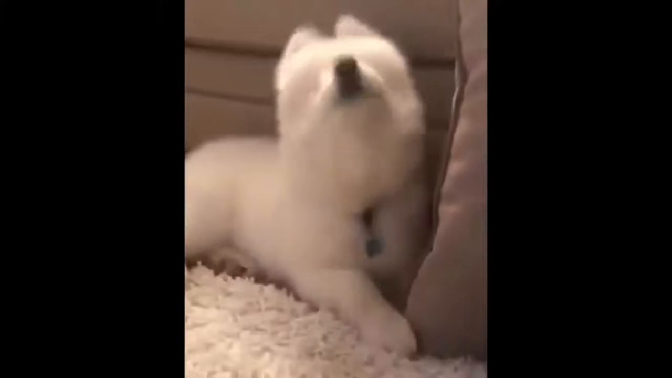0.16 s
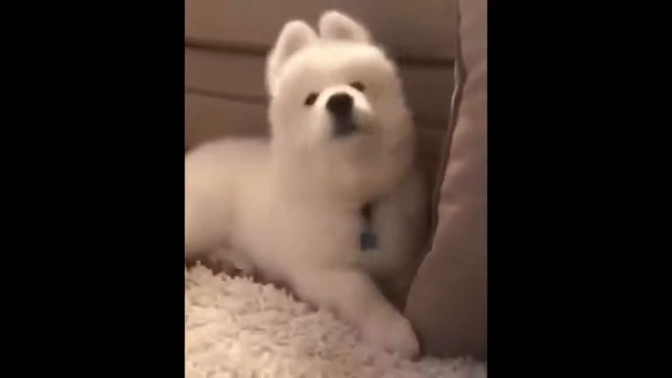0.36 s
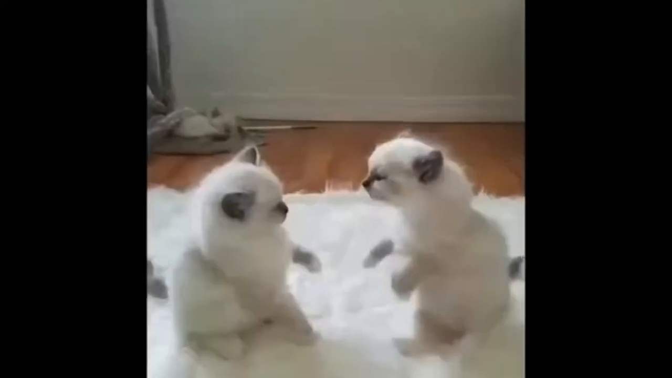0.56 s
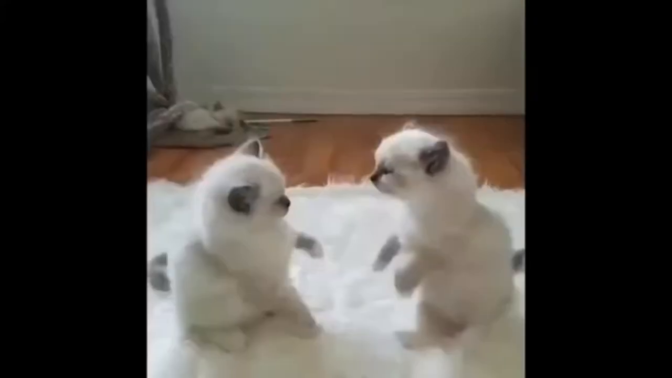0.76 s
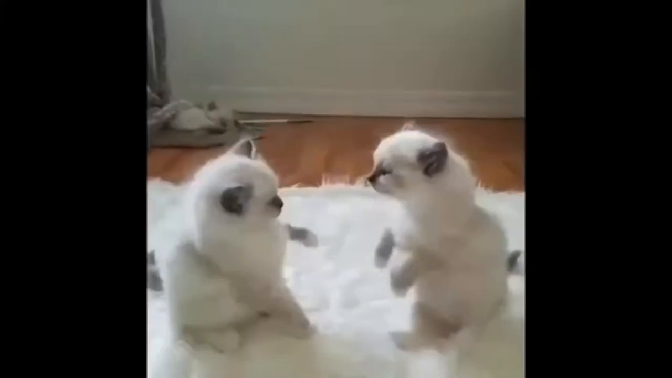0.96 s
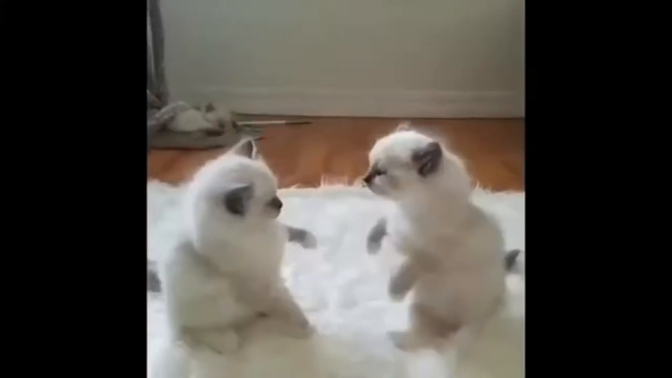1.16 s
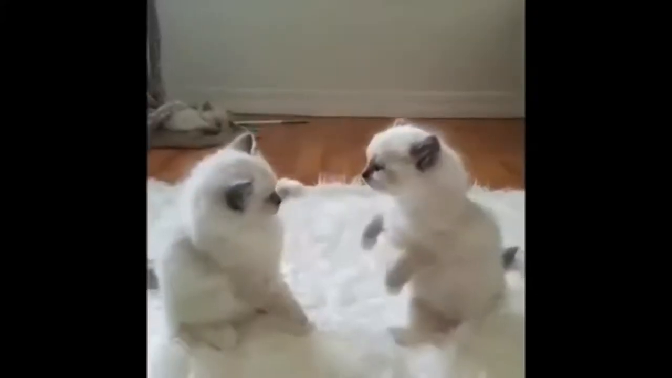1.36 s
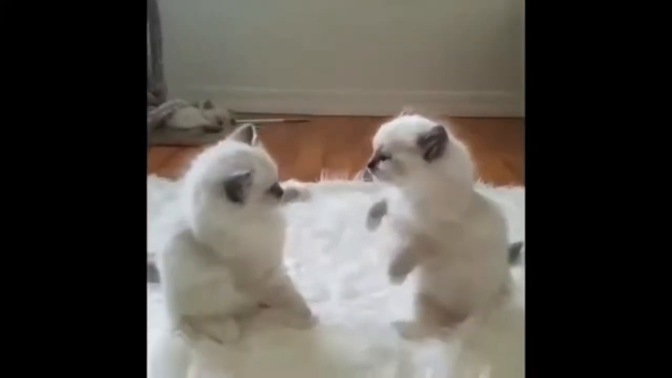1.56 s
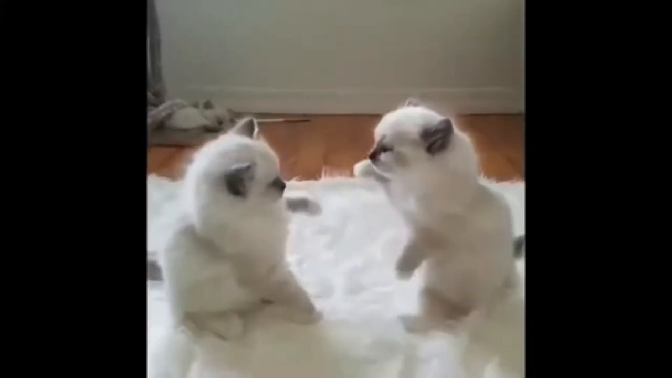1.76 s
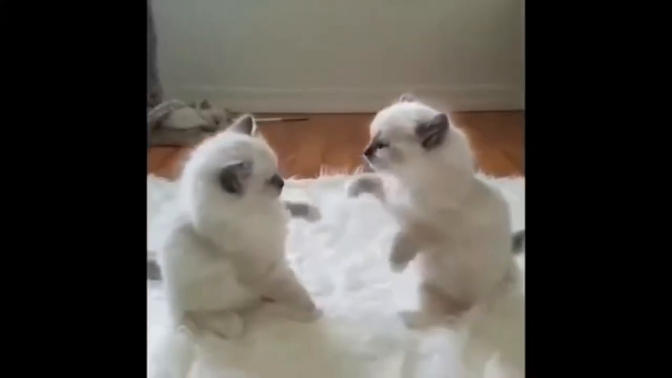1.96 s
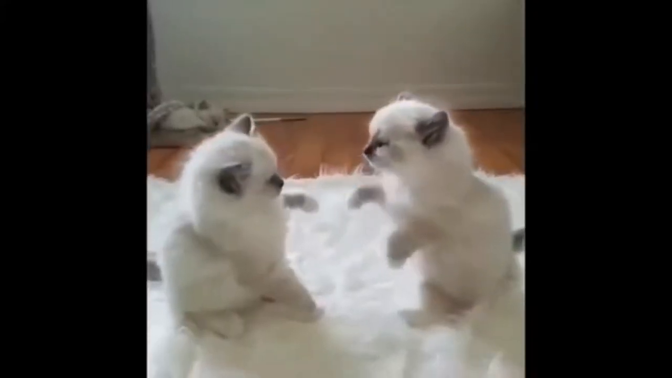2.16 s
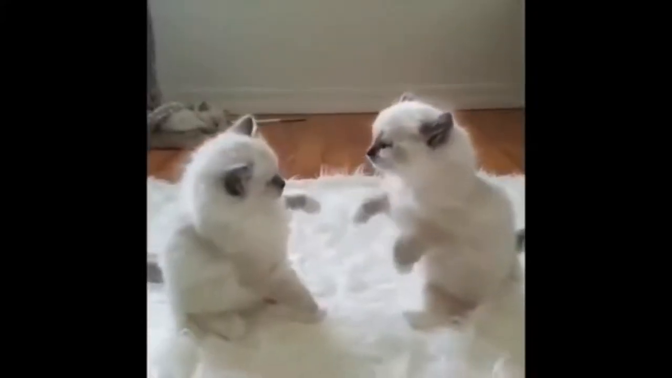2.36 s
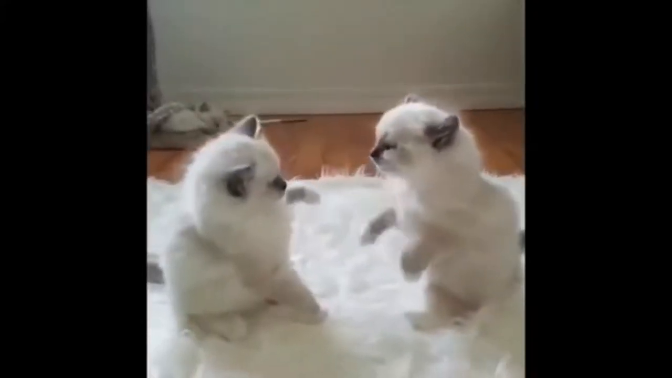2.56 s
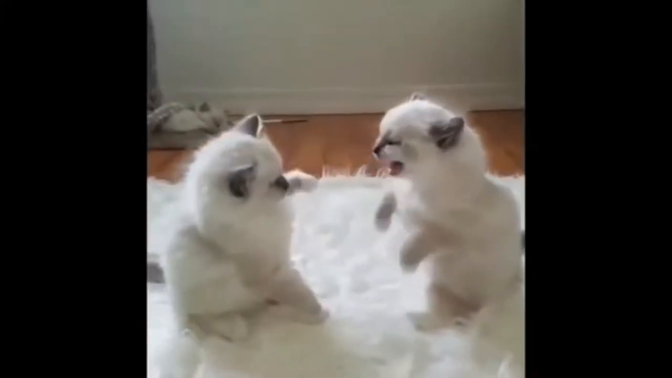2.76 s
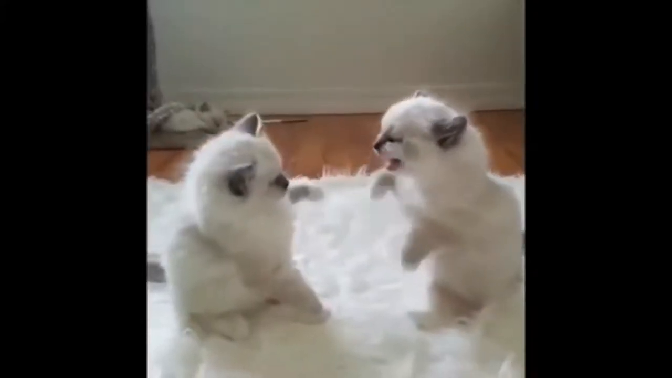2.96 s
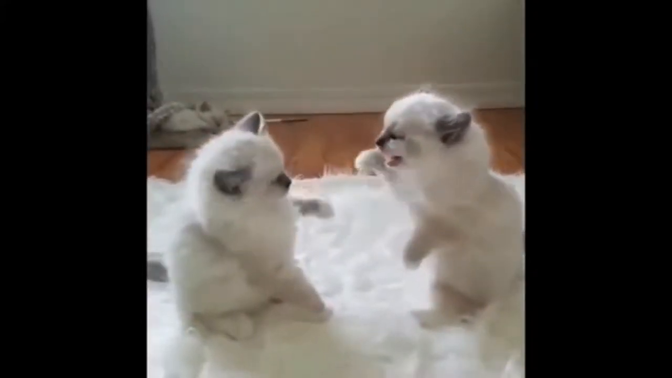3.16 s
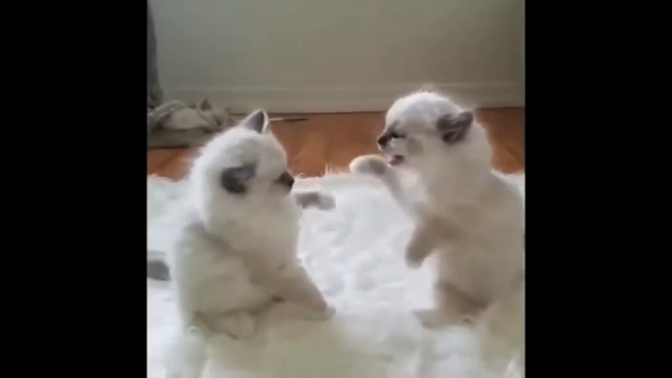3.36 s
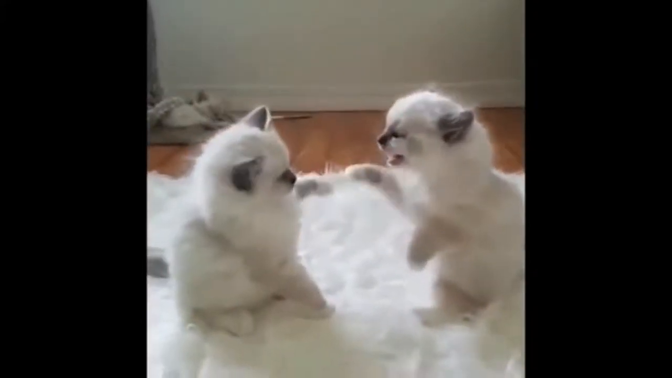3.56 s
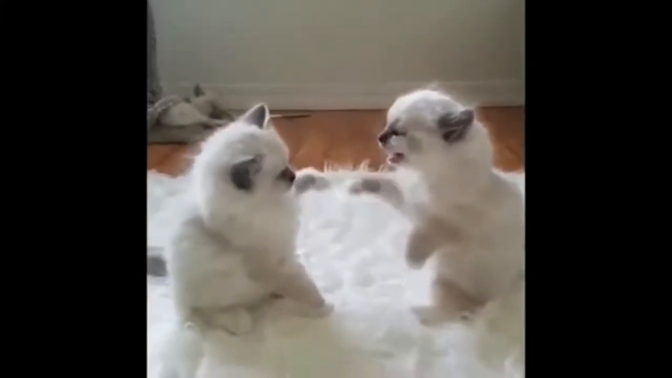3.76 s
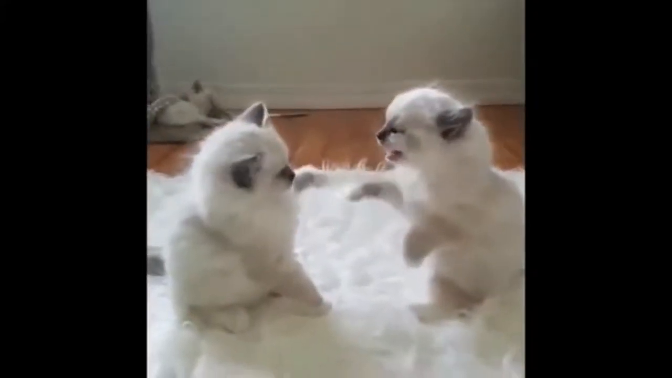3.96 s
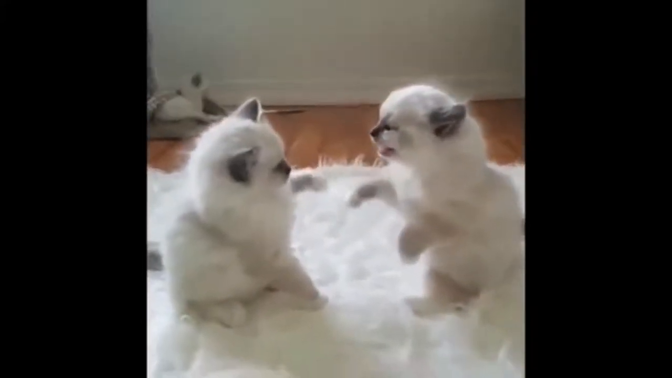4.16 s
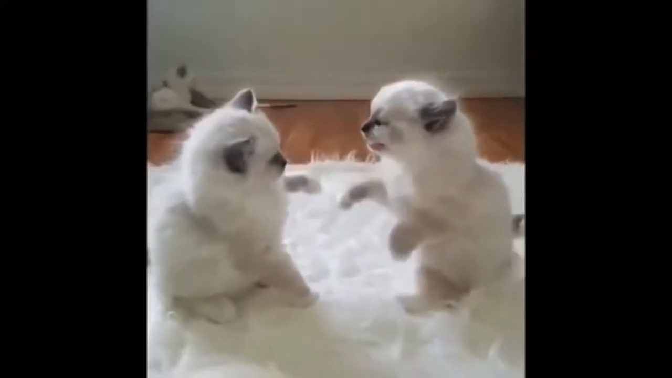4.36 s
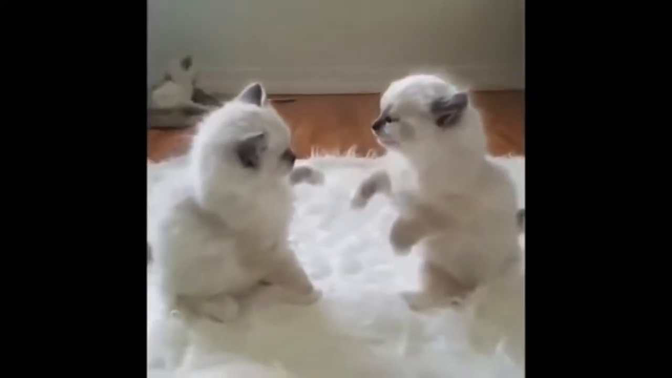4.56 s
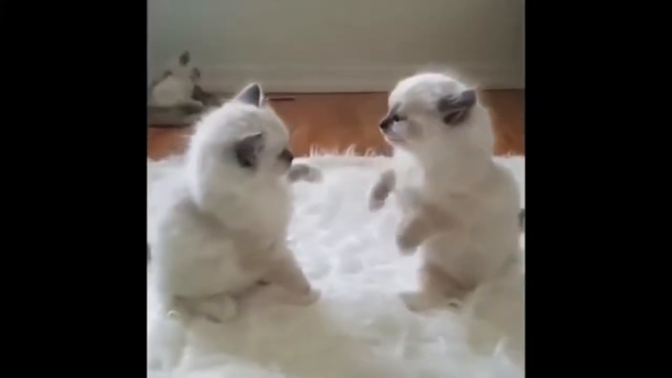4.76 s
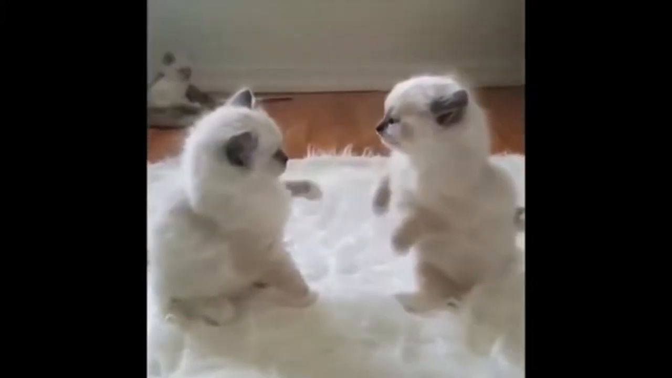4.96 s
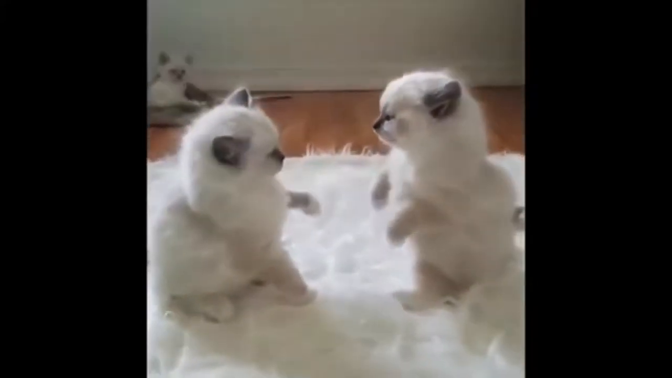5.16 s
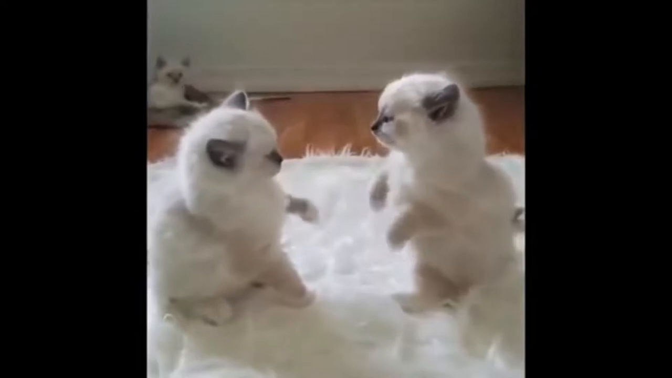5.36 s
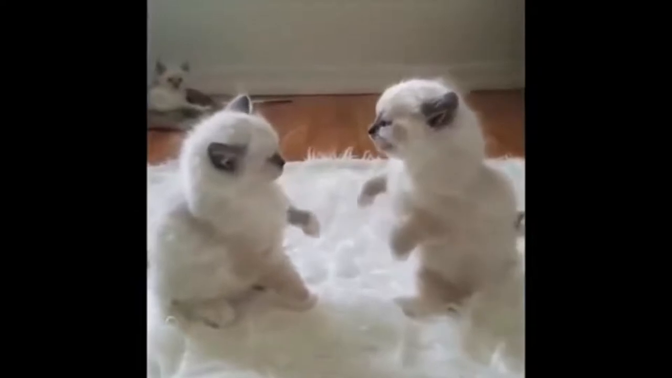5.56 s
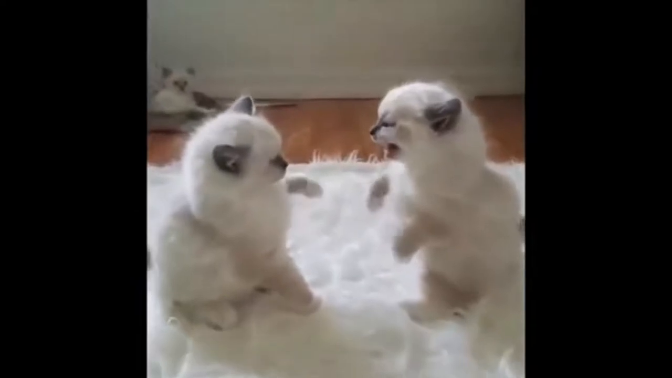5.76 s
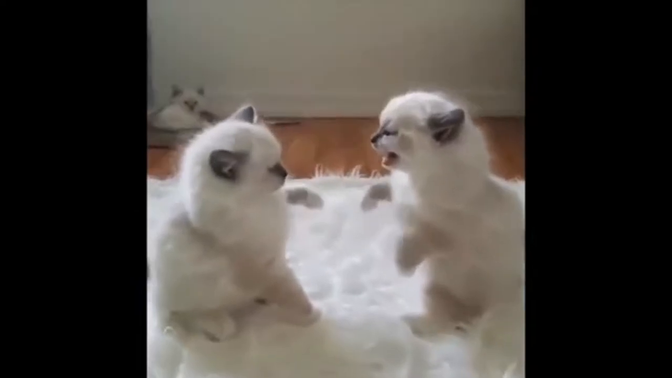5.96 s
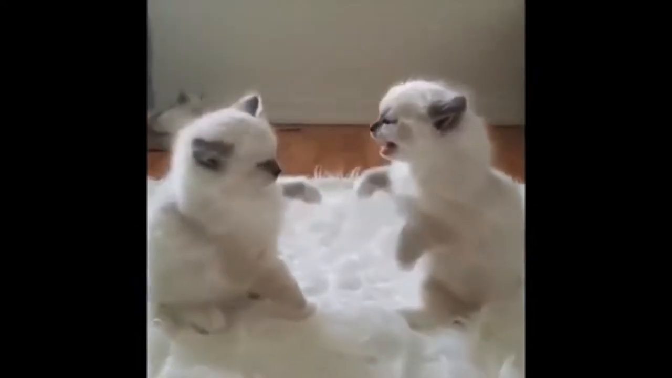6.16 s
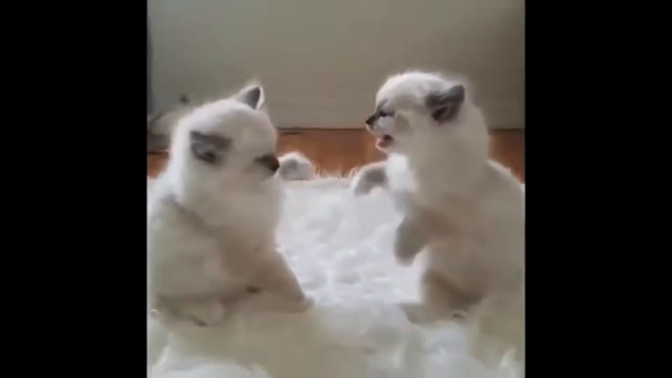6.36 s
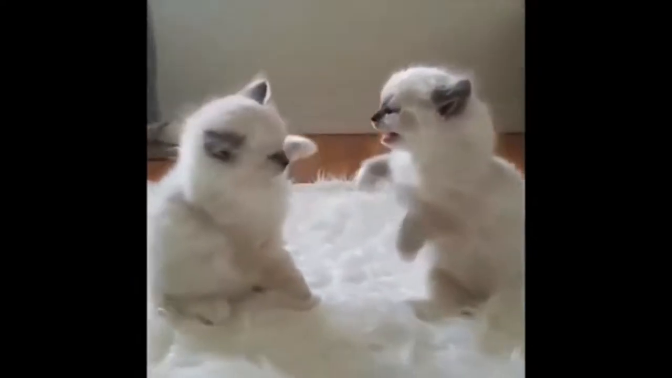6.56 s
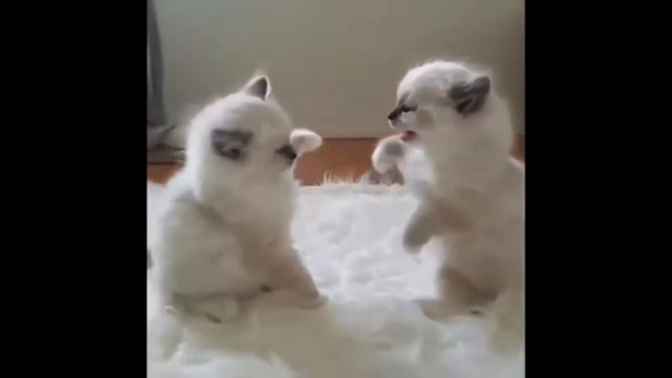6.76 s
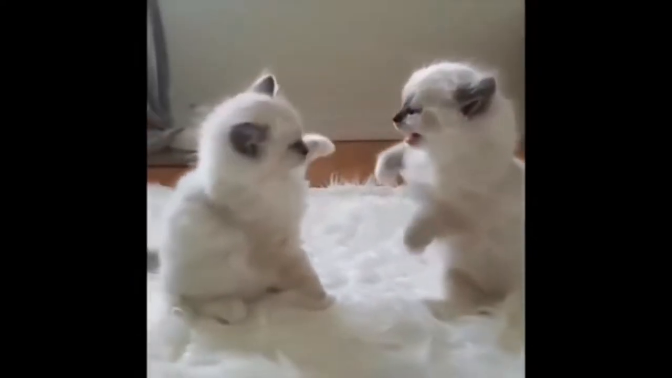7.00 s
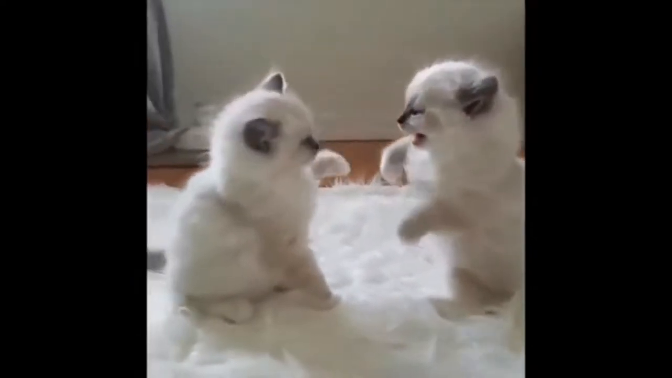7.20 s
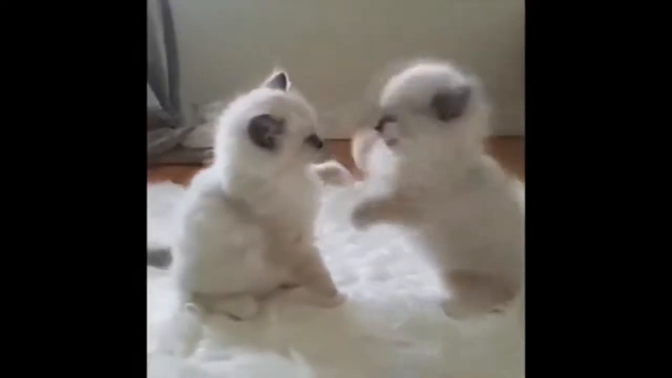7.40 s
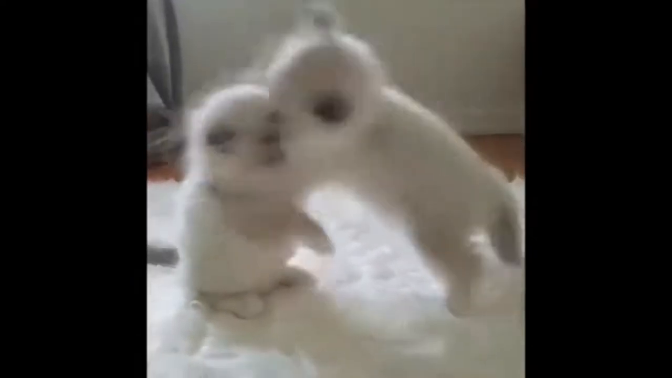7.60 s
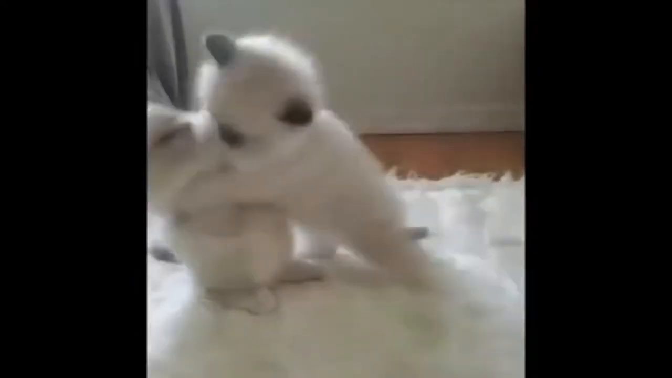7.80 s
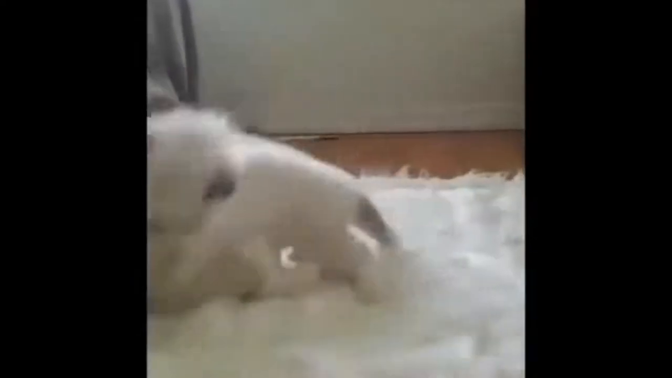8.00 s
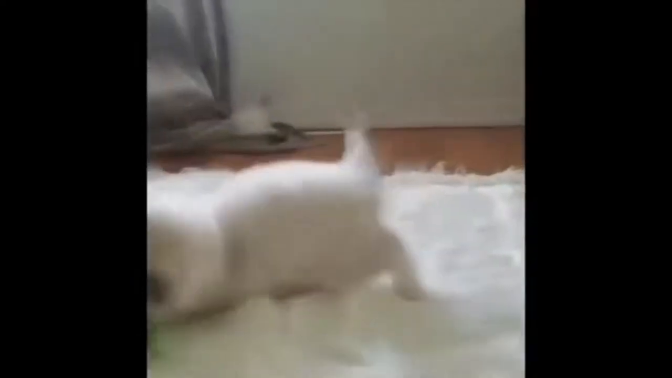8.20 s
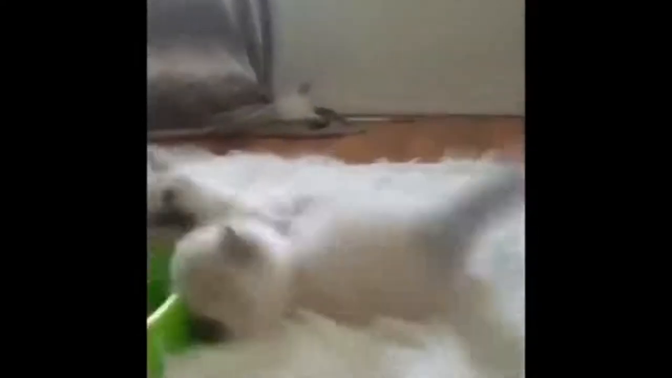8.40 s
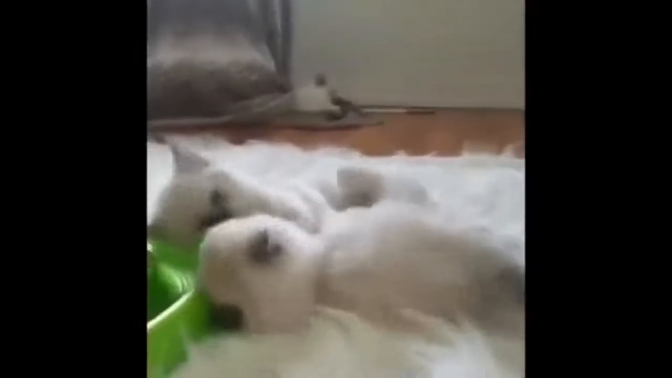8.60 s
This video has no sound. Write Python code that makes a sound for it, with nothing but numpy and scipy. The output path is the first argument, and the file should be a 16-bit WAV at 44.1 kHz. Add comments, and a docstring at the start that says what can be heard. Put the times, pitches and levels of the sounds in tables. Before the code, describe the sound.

In a home, a single high puppy yelp sounds right by the microphone and rings briefly in the room. After a short gap, two kittens spar on a rug, their paws lightly tapping and scuffing over a very low hum. Two long, faint, high meows come from a little farther away, with a quick cluster of close clicks between them. Finally a kitten bumps into something hollow with a solid thump.

```python
"""Puppy yelp and sparring kittens

A puppy close to a phone gives one short yelp that cracks upward and excites a living room's modes.
After a moment of silence, another room: two kittens spar on a rug, one drawing out two thin, faint
meows. Each voice is a harmonic source filtered by throat and mouth. Fur rustles, paws tap, something
clicks, and a tumble ends in the thump of a hollow object, over a low appliance hum."""
import sys
import numpy as np
from scipy import signal
from scipy.fft import rfft, irfft, next_fast_len
from scipy.io import wavfile
from scipy.ndimage import uniform_filter1d, map_coordinates

SR = 44100
rng = np.random.default_rng(int(sys.argv[2]) if len(sys.argv) > 2 else 0)


def to_wav(sig):
    """Store sig (one row per channel, or 1-D mono) as 16-bit WAV at the path in sys.argv[1].

    Samples outside -1..1 are clipped; the rate is SR.
    """
    pcm = np.clip(np.atleast_2d(sig), -1, 1) * 32767
    pcm = np.round(pcm).astype(np.int16)
    wavfile.write(sys.argv[1], SR, pcm.T)  # frames by channels


N = 380731
T = np.arange(N) / SR
PUPPY_END_S, KITTENS_START_S = .686, .764
TOP_HZ, KITTENS_TOP_HZ = 13900, 13200
ANTIPHASE = np.array([[1], [-1]])  # left, right


def undb(db):
    """Amplitude ratio of a level in decibels."""
    return 10 ** (np.asarray(db) / 20)


def unit(x):
    """Normalisation to rms 1."""
    return x / np.sqrt(np.mean(x ** 2) + 1e-30)


def since(start):
    """Seconds after a moment, zero before it."""
    return np.maximum(T - start, 0)


def until(end):
    """Seconds before a moment, zero after it."""
    return np.maximum(end - T, 0)


def during(start, end, fade):
    """A gate with linear edges."""
    return np.clip(np.minimum(T - start, end - T) / fade + .5, 0, 1)


def curves(table):
    """Linear interpolation of each column over time."""
    times, *columns = np.transpose(table)
    return [np.interp(T, np.sort(times), column) for column in columns]


def wander(rate):
    """Random modulation: `rate` Gaussian values a second, joined by lines."""
    knots = rng.standard_normal(N // 8)
    return map_coordinates(knots, [T * min(rate, SR / 9)], order=1)


def add(track, start, sound):
    """Superposition of a short sound on a track."""
    i = int(start * SR)
    track[..., i:i + sound.shape[-1]] += sound[..., :N - i]


def band(x, hz, width_hz):
    """A second-order resonator with gain 1 at its centre."""
    g, loss = np.tan(np.pi * min(hz, SR / 2.3) / SR), width_hz / hz
    poles = [1 + g * loss + g * g, 2 * (g * g - 1), 1 - g * loss + g * g]
    return signal.lfilter([g * loss, 0, -g * loss], poles, x)


def rolloff(x, hz, kind):
    """A low- or high-pass filter of 12 dB per octave."""
    return signal.sosfilt(signal.butter(2, hz, kind, fs=SR, output="sos"), x)


def band_limit(x, hz):
    """A steep elliptic low-pass filter."""
    return signal.sosfilt(signal.ellip(8, .2, 70, hz, fs=SR, output="sos"), x)


def formant(hz, centre_hz, width_hz):
    """Bell-shaped gain of a vocal-tract resonance."""
    return 1 / (1 + (2 * (hz - centre_hz) / width_hz) ** 2)


def noise(spectrum):
    """Gaussian noise of rms 1, shaped by points of f/Hz, relative level/dB."""
    hz, db = np.transpose(spectrum)
    size = next_fast_len(N)
    bin_hz = np.arange(size // 2 + 1) * SR / size
    gain = undb(np.interp(np.log(bin_hz + 1), np.log(hz), db))
    return unit(irfft(rfft(rng.standard_normal(size)) * gain, size)[:N])


def wide_noise(spectrum, side_db):
    """Partially coherent noise at two microphones."""
    return noise(spectrum) + undb(side_db) * noise(spectrum) * ANTIPHASE


def reverb(x, t60, treble_t60, gap_s, side_db):
    """A diffuse field in two channels: exponential decay at separate rates below and above 2.5 kHz."""
    t = T[:SR]
    white = rng.standard_normal((2, SR))
    low = rolloff(white, 2500, "low") * undb(-60 * t / t60)
    high = rolloff(white[::-1], 2500, "high") * undb(-60 * t / treble_t60)
    arrived = t > gap_s
    mid, side = (low + high) * arrived / np.sqrt(np.sum(undb(-120 * t / t60) * arrived))
    response = mid + undb(side_db) * side * ANTIPHASE
    return signal.fftconvolve(x[None], response, axes=1)[:, :N]


# Noise spectra of the kittens' room: f/Hz, relative level/dB
RUMBLE_SPECTRUM = [(15, -53), (25, -30), (54, -10.5), (123, 2.5), (147, -10), (184, -4.5), (271, -8.5),
                   (325, -8), (430, -19), (545, -23), (700, -23.5), (910, -29.5), (1540, -120)]
HISS_SPECTRUM = [(290, -33), (500, -5.5), (1370, -12), (1510, -12.5), (3900, -18.5), (4730, -26),
                 (12400, -24.5), (13500, -28)]
# Partials of the hum: f/Hz, level/dB
HUM_PARTIALS = [(86, -67), (119.5, -66), (426, -74.5)]


def appliance():
    """Tones in broadband noise: a wavering hum and a rumble fade up under a faint, steady hiss."""
    fade_db = -10.5 * np.exp(-since(KITTENS_START_S) / .36)
    rumble = wide_noise(RUMBLE_SPECTRUM, side_db=-17.5) * undb(-59 + fade_db)
    hum = 0
    for hz, db in HUM_PARTIALS:
        amplitude = np.sqrt(2) * undb(db + fade_db + 3 * wander(7))
        phase = 2 * np.pi * np.cumsum(hz * (1 + .012 * wander(9))) / SR
        hum = hum + amplitude * np.sin(phase)
    return rumble + hum + undb(-73) * wide_noise(HISS_SPECTRUM, side_db=1)


# Noise spectrum of the puppy's room: f/Hz, relative level/dB
AIR_SPECTRUM = [(15, -36.5), (25, -6), (91, -1), (219, -12.5), (372, -16), (413, -22.5), (780, -24.5),
                (1130, -29), (1550, -24), (2250, -36.5), (4020, -32.5), (14000, -49)]
# Its envelope: t/s, level/dB
AIR_ENVELOPE = [(0, -48), (.23, -39.5), (.28, -46), (.38, -51), (.5, -52), (.68, -45)]


def living_room_air():
    """Amplitude-modulated ambient noise, strongest around the yelp."""
    return noise(AIR_SPECTRUM) * undb(curves(AIR_ENVELOPE)[0] + 1.7 * wander(25))


# Slow shifts of a body: centre t/s, half duration/s, rub level/dB, hiss level/dB
BODY_SHIFTS = [(0.792, 0.051, -69, -73), (1.434, 0.082, -72, -66.5), (2.214, 0.12, -60, -65.5),
               (2.687, 0.094, -69.5, -65.5), (3.08, 0.077, -61, -72), (4.222, .09, -69, -67.5),
               (4.55, 0.054, -65.5, -66), (4.79, 0.2, -75.5, -62.5), (5.267, 0.052, -69, -75),
               (7.565, 0.065, -62, -80), (8.253, 0.096, -63, -71)]


def fur_rustle():
    """Friction noise of fur and rug: each shift adds its power to a faint resting rub and hiss."""
    rub_power, hiss_power = undb(-71.5) ** 2, undb(-77.5) ** 2
    for start, half_length, rub_db, hiss_db in BODY_SHIFTS:
        swell = np.exp(-((T - start) / half_length) ** 2)
        rub_power = rub_power + swell * undb(rub_db) ** 2
        hiss_power = hiss_power + swell * undb(hiss_db) ** 2
    rub = wide_noise([(300, 16.5), (700, 6.5), (2800, 7), (5000, -8.5), (13000, -71)], side_db=-1.5)
    rub *= np.sqrt(rub_power) * undb(4.3 * wander(40))
    hiss = wide_noise([(2000, .5), (5000, 3), (7500, -2), (10000, -5), (13000, -4)], side_db=0)
    hiss *= np.sqrt(hiss_power) * undb(2.2 * wander(310))
    return rub + hiss


# Paws scuffing the rug: t/s, duration/s, level/dB, centre f/Hz, bandwidth/Hz
PAW_SCUFFS = [(1.193, 0.048, -63.5, 2300, 2490), (1.521, 0.14, -66.5, 1510, 701),
              (2.371, 0.041, -50, 4100, 5840), (2.375, 0.13, -60.5, 4650, 7850),
              (2.383, 0.083, -54.5, 664, 1200), (2.595, 0.083, -56.5, 6500, 6070),
              (3.159, 0.081, -64, 5900, 6000), (4.624, 0.13, -53.5, 200, 590),
              (4.636, 0.086, -60, 8480, 6000), (4.718, 0.015, -48, 6000, 6100),
              (4.766, 0.079, -50, 128, 157), (4.863, 0.087, -52.5, 350, 870),
              (4.989, 0.45, -70, 11100, 7000), (6.759, 0.074, -64.5, 6800, 8000),
              (7.499, 0.013, -50, 5150, 5030), (7.513, 0.072, -56.5, 5360, 3034),
              (8.475, 0.058, -56.5, 2430, 1210)]


def scuffs():
    """Sliding friction: short bursts of grainy band-pass noise."""
    out = np.zeros((2, N))
    for start, length, db, hz, width_hz in PAW_SCUFFS:
        age = T[:SR // 2] / length
        swell = np.minimum(age / .096, 1) * np.exp(-1.5 * age ** 2)
        grains = rng.standard_normal((2, SR // 2)) * undb(1.8 * rng.standard_normal(SR // 2))
        mid, side = unit(band(band(grains, hz, width_hz), hz, width_hz))
        add(out, start, undb(db) * swell * (mid + .86 * side * ANTIPHASE))
    return out


def knock(db, hz, cycles):
    """Damped free vibration of a surface, falling 60 dB in the given number of cycles."""
    t = T[:SR // 4]
    ring = band(np.sin(2 * np.pi * hz * t) * undb(-60 * t * hz / cycles), hz, 6.6 * hz)
    return undb(db) * ring / np.abs(ring).max()


def click(db, hz):
    """An impact transient: a knock plus a bright snap that grows with its pitch up to 2 kHz."""
    t, snap_t60 = T[:SR // 4], .0072
    snap = unit(band(rng.standard_normal(len(t)), hz=6460, width_hz=1700))
    snap *= undb(db - 13.5 - 60 * t / snap_t60) * min(hz / 2000, 1)
    return knock(db, hz, cycles=7.9) + snap


# Paw taps on the floor: t/s, peak level/dB, f/Hz
PAW_TAPS = [(1.786, -48.5, 1300), (1.846, -45, 1210), (2.425, -40, 600), (2.762, -33, 660),
            (3.100, -42, 593), (4.544, -41.5, 1093), (4.885, -34.5, 112), (5.300, -48, 905),
            (6.218, -26, 567), (6.293, -35, 640), (6.299, -35, 566), (7.770, -41, 890), (7.842, -35.5, 620),
            (7.901, -36.5, 825), (8.487, -35.5, 2410), (8.489, -30.5, 540), (8.521, -42, 796)]
# Clicks and bumps beside one microphone: t/s, peak level/dB, f/Hz, left minus right/dB
NEAR_CLICKS = [(4.408, -18, 2360, 27), (4.415, -32, 2830, 18), (4.439, -26.5, 2400, 24),
               (5.398, -39.5, 207, -25)]


def taps_and_clicks():
    """The direct-to-reverberant ratio marks distance: taps lie out in the room, clicks close by."""
    direct, to_room = np.zeros((2, N)), np.zeros(N)
    tap_pan_db, tap_room_db, click_room_db = 2.5, -5, -21
    hits = [(start, knock(db, hz, cycles=3.8), tap_pan_db, tap_room_db) for start, db, hz in PAW_TAPS]
    hits += [(start, click(db, hz), pan_db, click_room_db) for start, db, hz, pan_db in NEAR_CLICKS]
    for start, ring, pan_db, room_db in hits:
        sides = undb(pan_db * ANTIPHASE / 2)
        add(direct, start, ring * sides / sides.mean())
        add(to_room, start, ring * undb(room_db))
    return direct + reverb(to_room, t60=.43, treble_t60=.32, gap_s=.00045, side_db=-10)


# Blows of the tumble: t/s, relative impulse level/dB, contact time/s
TUMBLE_BLOWS = [(8.1812, -2, 0.002), (8.186, -15, 0.002), (8.1943, -6, 0.0029), (8.2020, -12.5, 0.00045)]
# Modes of the hollow object: f/Hz, relative level/dB, T60/s
HOLLOW_MODES = [(45, -29, .15), (179, -19.5, 0.5), (238, -2, 0.066), (237, -34, 1), (272, -10, 0.12),
                (367.5, -8.5, .22), (417, -6.5, 0.063), (479, -16.5, 0.23), (562, -12.5, 0.068),
                (730, -26, 0.11), (910, -33, .12), (1170, -23.5, 0.1)]


def thump():
    """Modal response to force pulses: a body bounces against something hollow, brushing the rug."""
    force, brush = np.zeros(N), np.zeros(N)
    t, brush_t60 = T[:SR], .069
    for start, db, contact in TUMBLE_BLOWS:
        push = t * np.exp(-4 * t / contact)
        add(force, start, undb(db) * push / push.sum())
        add(brush, start, undb(db - 60 * t / brush_t60) * rng.standard_normal(SR))
    response = sum(undb(db - 60 * t / t60) * np.sin(2 * np.pi * hz * t) for hz, db, t60 in HOLLOW_MODES)
    boom = signal.fftconvolve(force, response)[:N]
    scrape = undb(-19.5) * band(band(brush, 720, 1020), 720, 1080) + undb(-43) * brush
    sound = undb(-5.5) * rolloff(boom, 205, "high") + undb(-17.5) * boom + scrape
    # the source lies to the left, so the right microphone hears it later
    direct = np.array([sound, np.interp(T - .00038, T, sound)])
    return direct + undb(-6.5) * reverb(sound, t60=.44, treble_t60=.29, gap_s=.012, side_db=-11.5)


def meow(pitch_curve, effort_curve, formants, start, end, accent_s, jitter, closing):
    """Source and filter: harmonics glide through formants, bright at first, sinking as the mouth shuts."""
    level_db, treble_db = curves(effort_curve)
    gate = during(start, end, fade=.024)
    on = gate > 0
    scoop = .03 * np.exp(-since(start) / .015)  # the pitch rises into the note
    pitch = (curves(pitch_curve)[0] * (1 - scoop + jitter * wander(60) + .0046 * wander(1200)))[on]
    accent = np.exp(-(since(start)[on] / accent_s) ** 3)
    sink = 1 - closing * np.exp(-until(end)[on] / .17)
    harmonic = np.arange(1, 14)[:, None]
    power = 0
    for i, (hz, width_hz, db, accent_db) in enumerate(formants):
        db = db + level_db[on] + accent_db * accent + treble_db[on] * (hz > 4500)
        centre_hz = hz * sink if i else hz  # the lowest resonance, the throat's, stays put
        power = power + (undb(db) * formant(harmonic * pitch, centre_hz, width_hz)) ** 2
    phase = 2 * np.pi * np.cumsum(pitch) / SR
    voice = np.zeros(N)
    voice[on] = np.sum(np.sqrt(2 * power) * np.sin(harmonic * phase), axis=0)
    rasp = unit(band(rng.standard_normal(N), 2800, 2200)) * undb(-62.5) * np.exp(-since(start) / .018)
    return (voice + rasp) * gate * undb(1.54 * wander(35))


# Fundamental of each meow: t/s, f/Hz
MEOW_1_PITCH = [(2.835, 1100), (3.017, 1132), (3.135, 1082), (3.207, 1118), (3.247, 1055), (3.619, 1005),
                (3.725, 975), (3.849, 898), (3.941, 884.3), (4.085, 898.7), (4.195, 837), (4.267, 833),
                (4.333, 771.2), (4.497, 719.3), (4.515, 666), (4.555, 650)]
MEOW_2_PITCH = [(5.795, 1043), (5.867, 1092), (6.097, 1039), (6.199, 1050), (6.449, 1012), (6.571, 907),
                (6.605, 902), (6.727, 828), (6.839, 834), (6.879, 849), (7.143, 881), (7.187, 940),
                (7.363, 987), (7.55, 1019)]
# Vocal effort: t/s, relative level/dB, extra treble level/dB
MEOW_1_EFFORT = [(2.85, -0.5, 0), (3.12, -0.5, -0.5), (3.25, -6, -1), (3.4, 1.5, -0.5), (3.75, -3, 2),
                 (4.05, 1.5, -0.5), (4.25, -1, -8), (4.479, 1.5, -18), (4.555, -2, 6)]
MEOW_2_EFFORT = [(5.8, -0.5, 0), (6.0, -8, 2), (6.12, -1, -1.5), (6.6, -5, -3.5), (7.0, -4.5, -8.5),
                 (7.42, -5, 6.5), (7.55, -6.5, -2)]
# Throat and mouth resonances: f/Hz, bandwidth/Hz, level/dB, change in the opening accent/dB
MEOW_1_FORMANTS = [(1380, 660, -58.5, -1), (2160, 500, -73.5, 16), (3340, 510, -66, 12.5),
                   (3820, 530, -67.5, -8), (5155, 920, -67, 2.5), (5960, 560, -77, 12),
                   (8570, 1500, -81, 8.5), (10640, 1000, -82, -18)]
MEOW_2_FORMANTS = [(1360, 870, -59.5, 1), (2100, 512, -68, 10), (3270, 730, -73.5, 21),
                   (4400, 1100, -72.5, -8), (5820, 1000, -69.5, 6.5), (8100, 1040, -77.5, 12.5)]


def kitten():
    """Direct and diffuse sound: two long meows a little to the right, much of them off the walls."""
    voice = meow(MEOW_1_PITCH, MEOW_1_EFFORT, MEOW_1_FORMANTS,
                 start=2.84, end=4.555, accent_s=.29, jitter=.004, closing=.21)
    voice += meow(MEOW_2_PITCH, MEOW_2_EFFORT, MEOW_2_FORMANTS,
                  start=5.803, end=7.55, accent_s=.21, jitter=.005, closing=.01)
    diffuse = reverb(voice, t60=.35, treble_t60=.26, gap_s=.003, side_db=.5)
    return voice * undb([[-.7], [.7]]) + undb(-3.5) * diffuse


# Modes of the living room: f/Hz, T60/s, level/dB
ROOM_MODES = [(858, 0.23, -8.5), (880, .85, -22), (1255, 0.21, -17.5), (1760, .5, -30), (2623, .2, -31.5),
              (3450, .6, -25.5), (4140, .4, 2)]
# Reflections from the far walls: delay/s, level/dB
WALL_ECHOES = [(.048, 0), (.186, -18.5), (.3, -32)]


def living_room(voice):
    """Reverberation and resonance: two diffuse tails, and echoes that ring at the room's modes."""
    near = reverb(voice, t60=.22, treble_t60=.21, gap_s=.029, side_db=-62.5)[0]
    far = reverb(band(voice, 1000, 1700), t60=.64, treble_t60=1, gap_s=.014, side_db=-60)[0]
    ring = sum(undb(db) * band(voice, hz, np.log(1000) / np.pi / t60) for hz, t60, db in ROOM_MODES)
    echoes = sum(undb(db) * np.interp(T - delay, T, ring) for delay, db in WALL_ECHOES)
    return voice + undb(-19.5) * near + undb(-23) * far + echoes


# The squeak after the yelp: t/s, fundamental f/Hz, level/dB
SQUEAK_CONTOUR = [(.362, 4230, -59.5), (.370, 4140, -34), (0.38, 4150, -41), (.388, 4100, -62),
                  (.42, 3960, -81.5)]


def squeak():
    """A thin, very high whistle whose second harmonic dominates the fundamental."""
    hz, db = curves(SQUEAK_CONTOUR)
    phase = 2 * np.pi * np.cumsum(hz * (1 + .004 * wander(580))) / SR
    tone = np.sqrt(2) * (np.sin(2 * phase) + undb(-13.5) * np.sin(phase))
    return tone * undb(db) * during(SQUEAK_CONTOUR[0][0], SQUEAK_CONTOUR[-1][0], fade=.0031)


def yelp_gesture():
    """A register break: a rough catch, a low note, then a crack upward, while the mouth closes."""
    catch_s, voiced_s, crack_s, release_s, settle_s = .243, .247, .307, .32, .0046
    catch_hz, sag_hz_per_s = 1250, 8000
    catch_db, full_db, attack_db_per_s, release_db_per_s = -17.5, -6, 3600, 3000
    stopping = since(release_s + settle_s)
    low_hz = 853 + 111 * np.exp(-until(crack_s) / .003)  # strains upward just before the crack
    high_hz = 1301 - sag_hz_per_s * (since(crack_s) - stopping)
    hz = np.select([T < voiced_s, T < crack_s], [catch_hz, low_hz], high_hz)
    hz = uniform_filter1d(hz, size=1 + int(.0016 * SR))  # each jump takes a moment
    swell = 1 - np.exp(-(since(.25) / .0035) ** 2 / 2)
    db = catch_db + (full_db - catch_db) * swell
    db -= attack_db_per_s * until(catch_s) + release_db_per_s * since(release_s)
    closing_s = since(voiced_s) - since(release_s)
    throat_hz, mouth_hz = 1480 - 4200 * closing_s, 3253 - 11000 * closing_s
    # the voice is roughest as it starts and stops
    roughness = .057 + .6 * (np.exp(-since(catch_s) / settle_s) + 1 - np.exp(-stopping / settle_s))
    return hz, db, throat_hz, mouth_hz, roughness


def yelp():
    """Source and filter: jittering harmonics pass two falling formants, with noisy rasp and fizz."""
    hz, db, throat_hz, mouth_hz, roughness = (curve[:SR] for curve in yelp_gesture())
    phase = 2 * np.pi * np.cumsum(hz * (1 + .26 * roughness * wander(900)[:SR])) / SR
    harmonic = np.arange(1, 16)[:, None]
    partial_hz = harmonic * hz
    throat = formant(partial_hz, throat_hz, width_hz=600) / harmonic ** 2.1
    mouth = undb(-7.5) * formant(partial_hz, mouth_hz, width_hz=320) / harmonic ** .73
    gains = (throat + mouth) / (1 + (partial_hz / 3700) ** 12)
    gains /= np.sqrt(np.sum(gains ** 2, axis=0) / 2)
    # above a spectral valley, a faint buzz of high harmonics
    gains += undb(-39) * formant(partial_hz, 10020, width_hz=4700) * (partial_hz < TOP_HZ)
    voice = np.sum(gains * np.sin(harmonic * phase), axis=0)
    rasp = noise([(400, -31), (900, -4.5), (1350, -1), (2100, -15), (3100, -4.5), (4200, -32),
                  (13000, -40)])[:SR]
    fizz = noise([(300, -16), (2000, -4), (4200, -13.5), (6000, -9), (9000, 1.5), (13500, -5.5)])[:SR]
    effort = undb(db)
    lag = np.exp(-1 / (.015 * SR))  # the fizz builds with the voice and outlasts it a little
    fizz *= signal.lfilter([1 - lag], [1, -lag], effort)
    return np.pad((voice + .55 * roughness * rasp) * effort + undb(-32) * fizz, (0, N - SR))


def puppy():
    """A transient lip smack precedes the voiced yelp and its squeak; one channel."""
    voice = yelp() + squeak()
    smack = band(rng.standard_normal(SR), 3000, 2200) * undb(-22 - 60 * T[:SR] / .012)
    add(voice, .2055, smack)
    return voice


def scene():
    """Two sound fields in succession: the puppy's room, a gap, then the kittens' room."""
    kittens = kitten() + taps_and_clicks() + thump() + fur_rustle() + scuffs() + appliance()
    kittens = band_limit(kittens, KITTENS_TOP_HZ) * during(KITTENS_START_S, 10, fade=.0021)
    puppy_room = living_room(puppy()) + living_room_air()
    return puppy_room * during(-1, PUPPY_END_S, fade=.0025) + kittens


def record(dry):
    """Soft saturation and band limiting: the phone rounds the loudest peaks and cuts the top."""
    rounded = dry / (1 + dry ** 8) ** (1 / 8)
    return band_limit(rounded, TOP_HZ)


dry = scene()
out = record(dry)
to_wav(out)
```